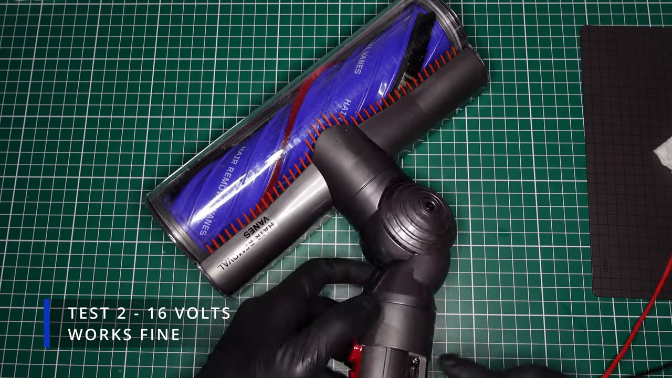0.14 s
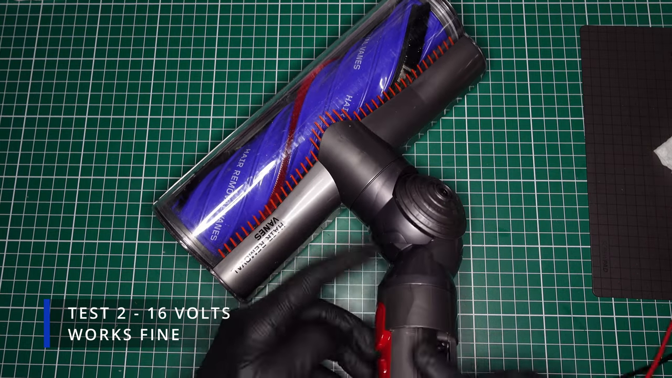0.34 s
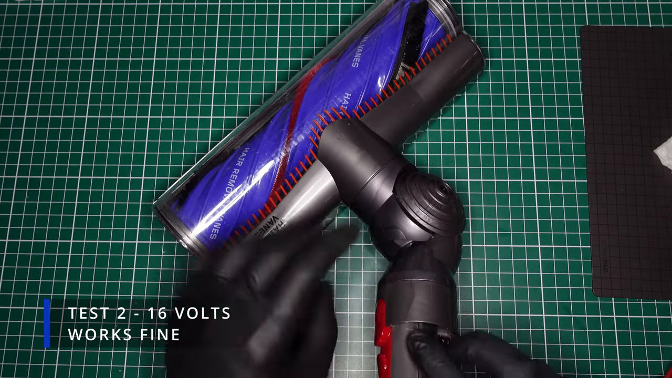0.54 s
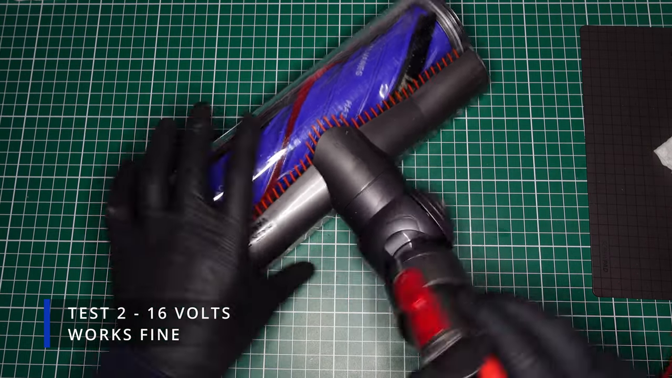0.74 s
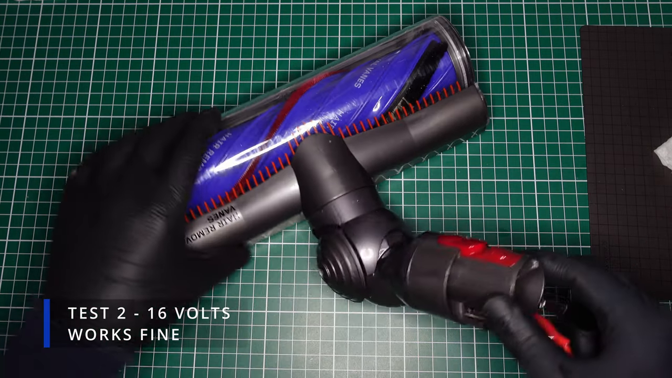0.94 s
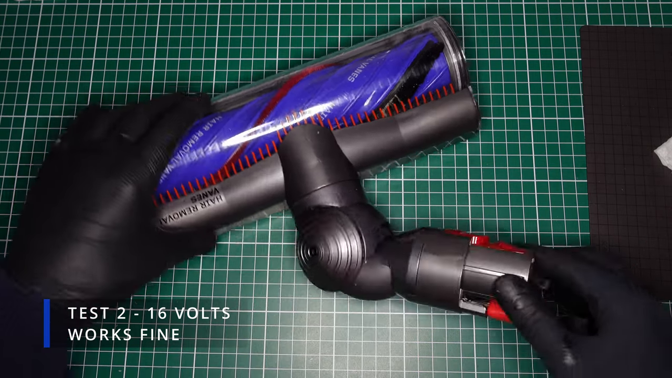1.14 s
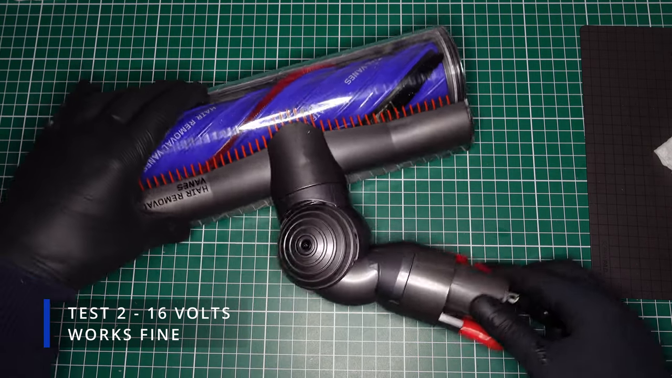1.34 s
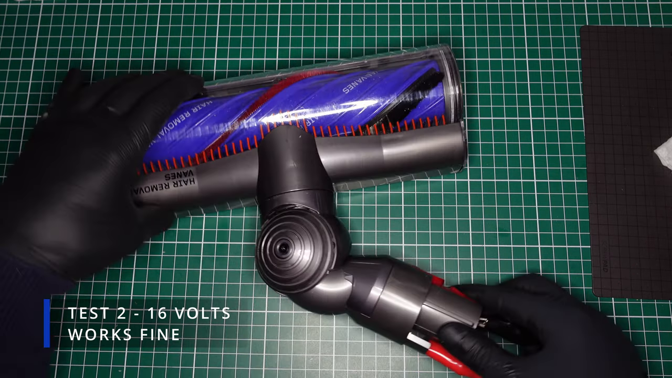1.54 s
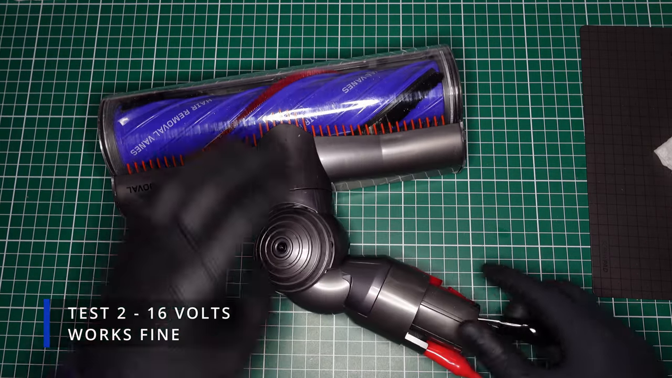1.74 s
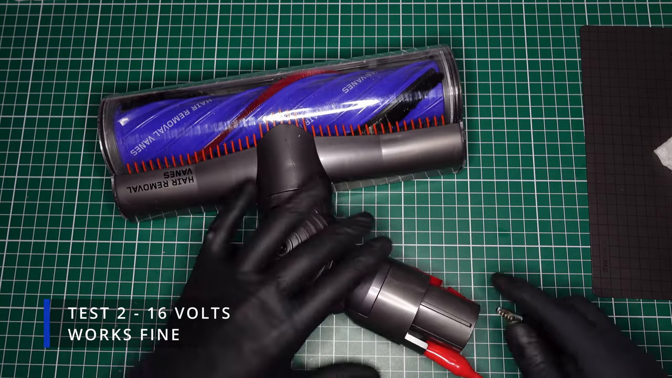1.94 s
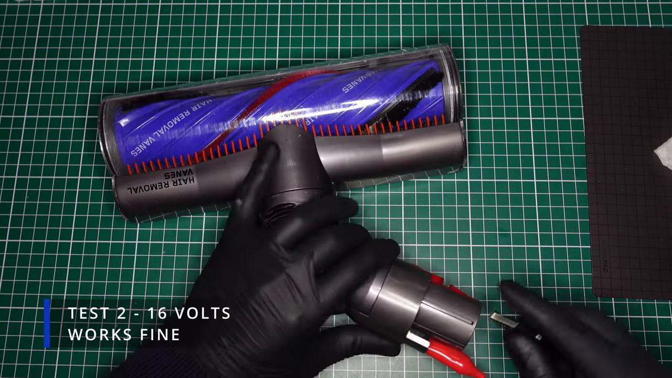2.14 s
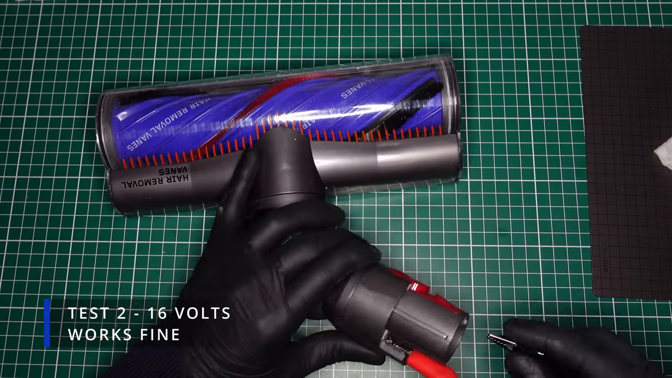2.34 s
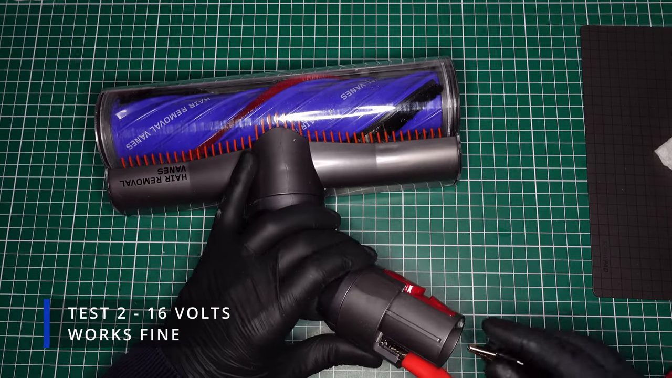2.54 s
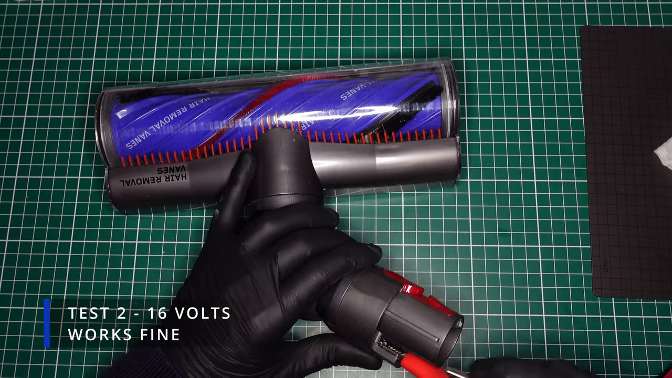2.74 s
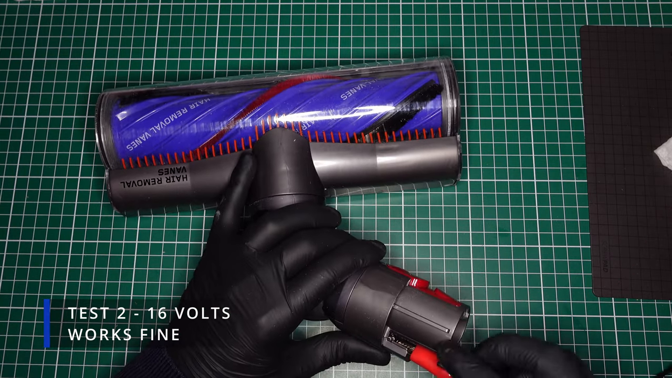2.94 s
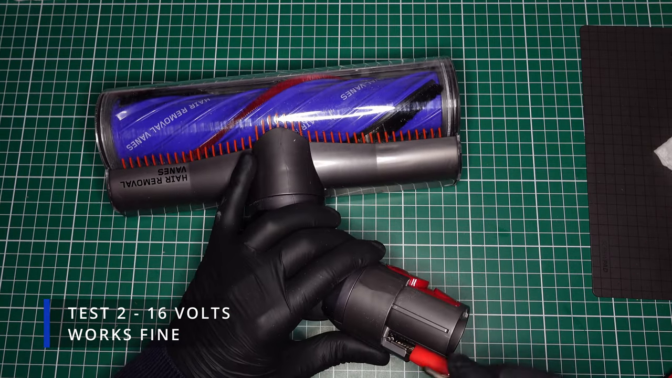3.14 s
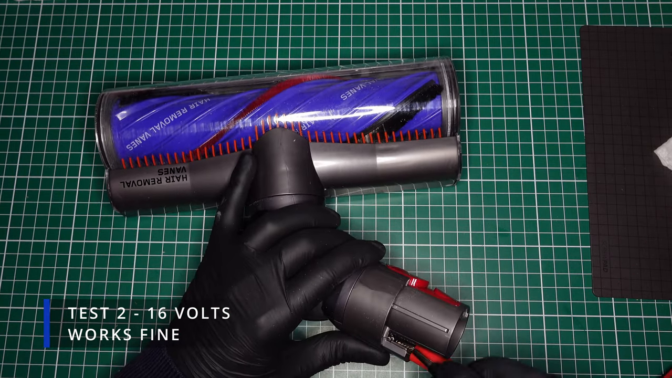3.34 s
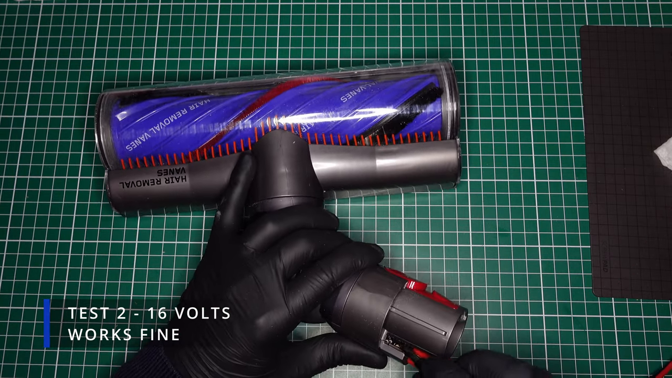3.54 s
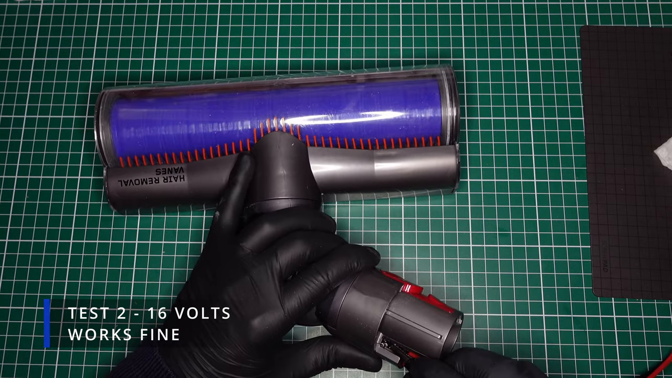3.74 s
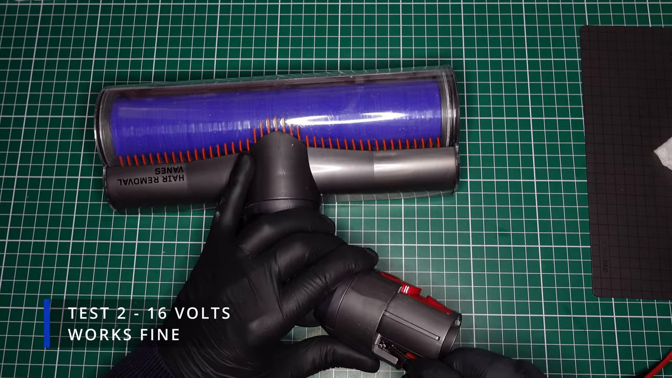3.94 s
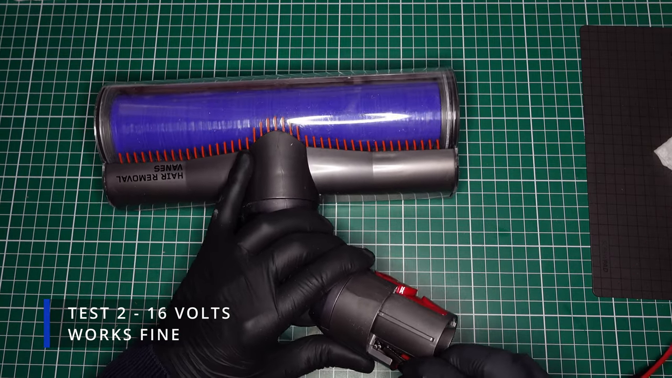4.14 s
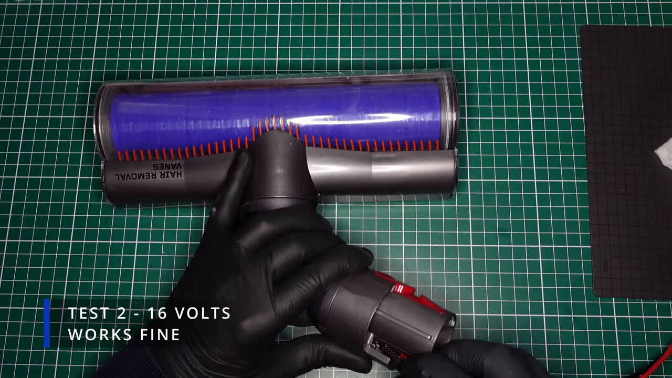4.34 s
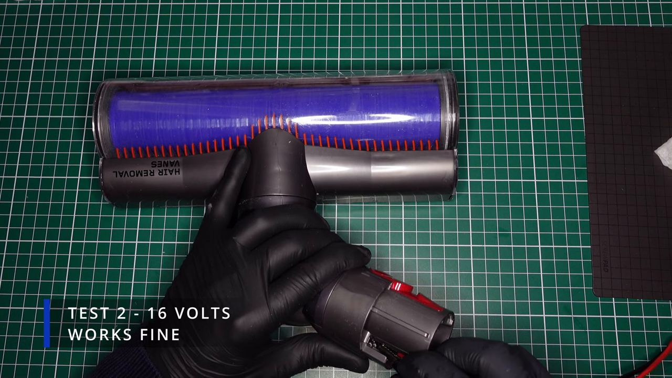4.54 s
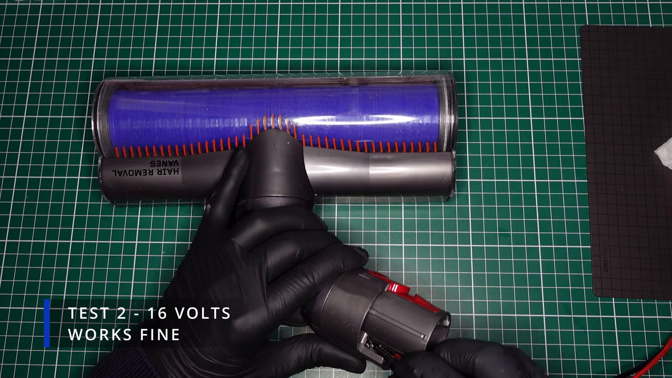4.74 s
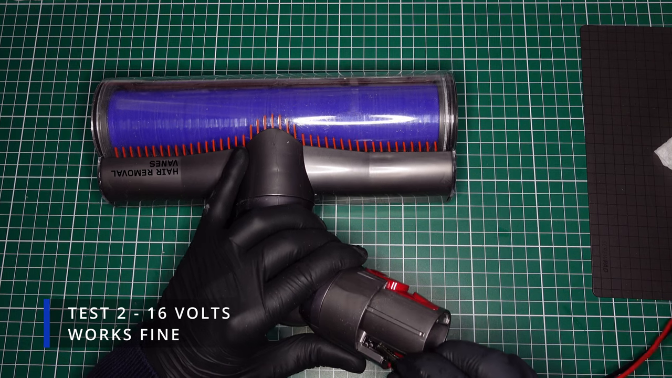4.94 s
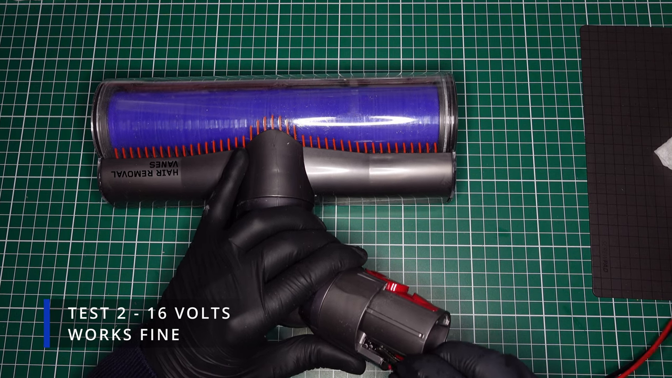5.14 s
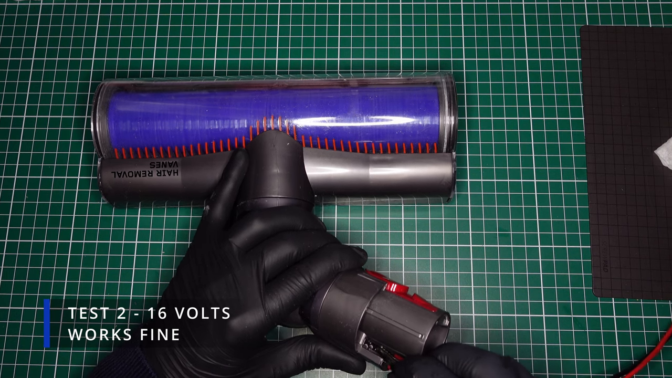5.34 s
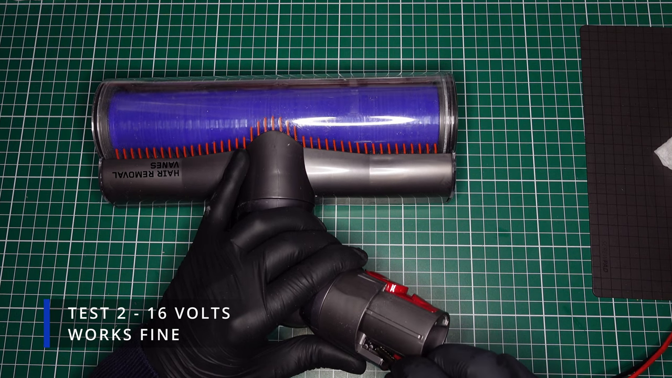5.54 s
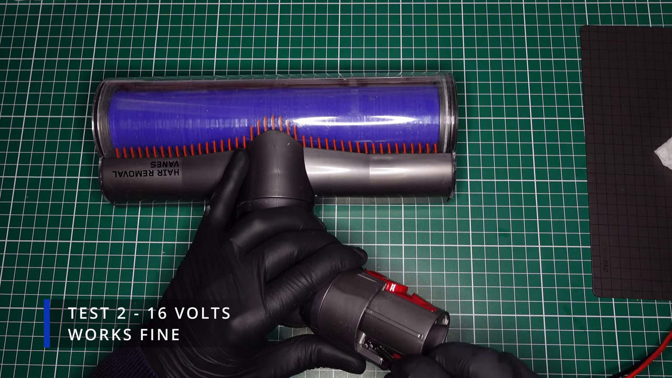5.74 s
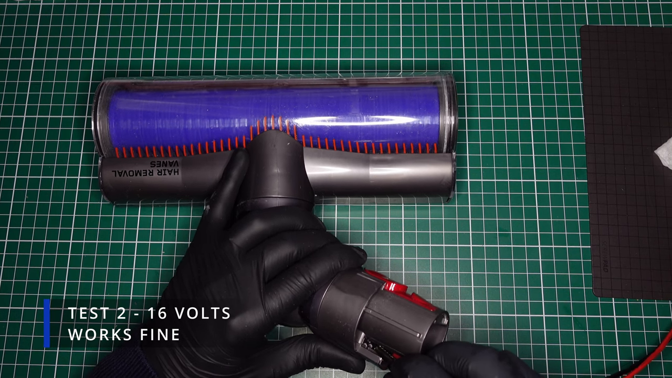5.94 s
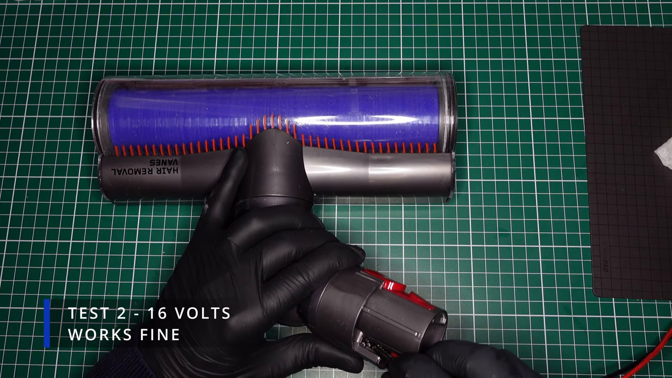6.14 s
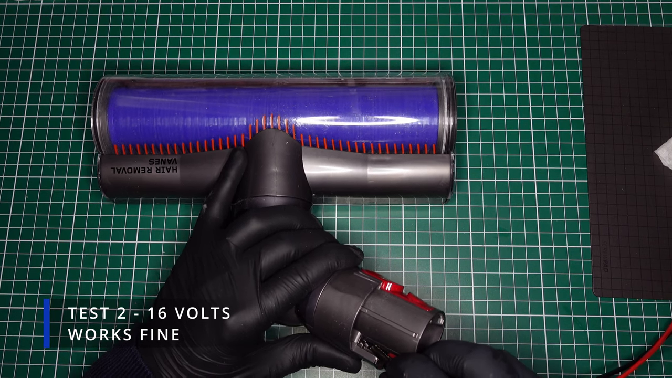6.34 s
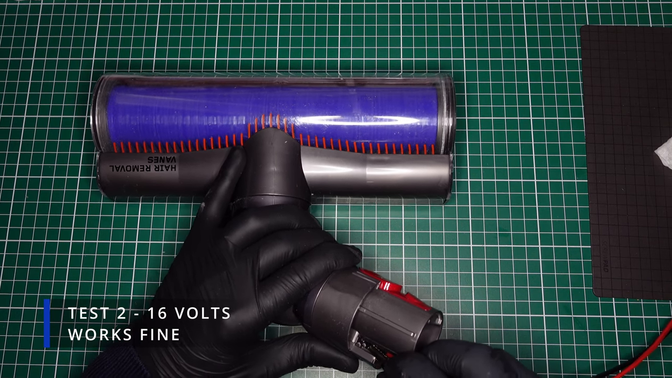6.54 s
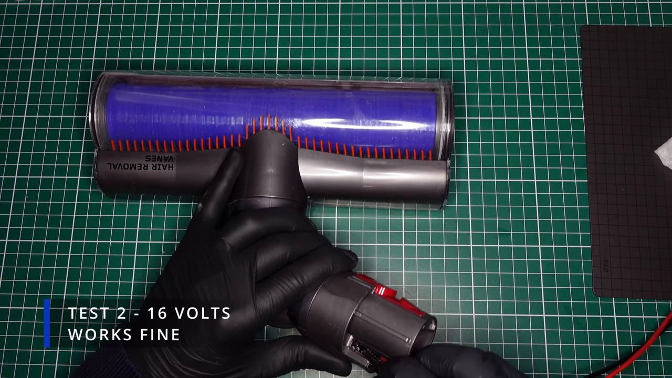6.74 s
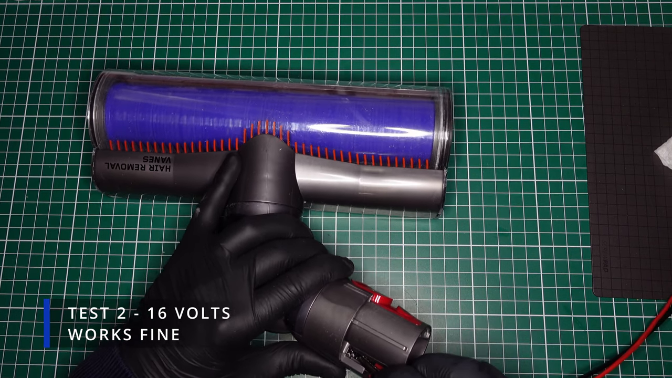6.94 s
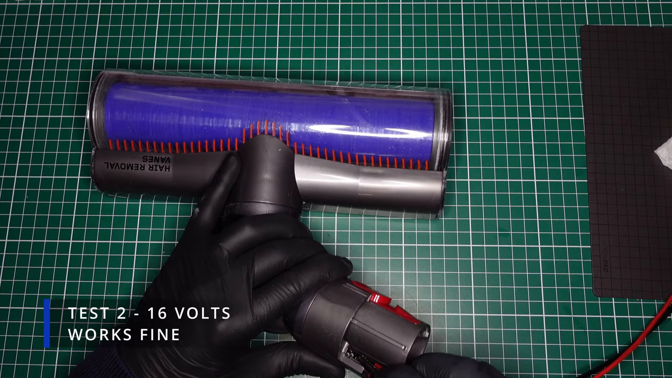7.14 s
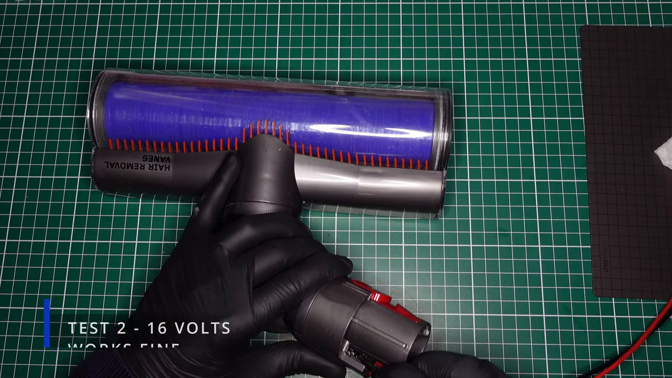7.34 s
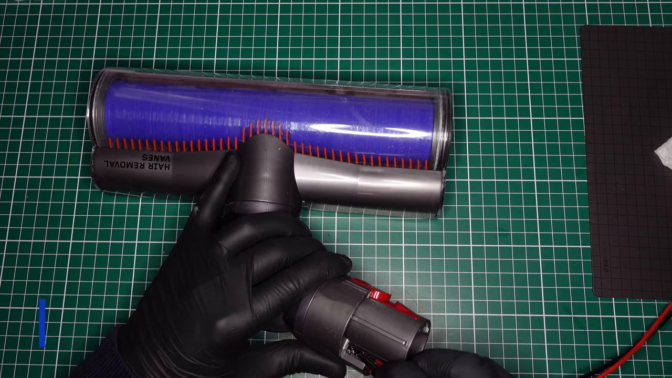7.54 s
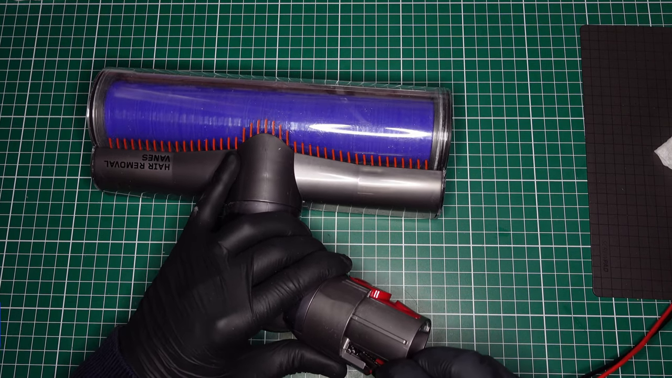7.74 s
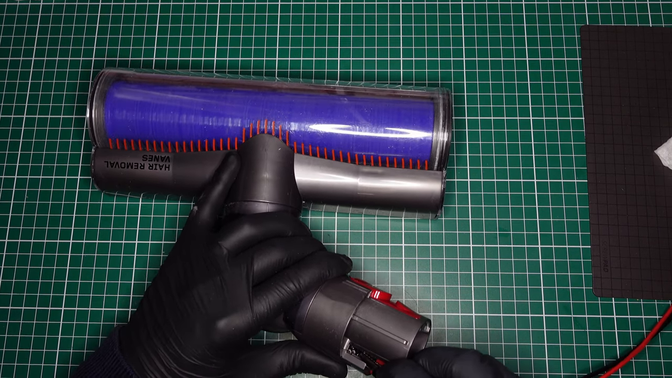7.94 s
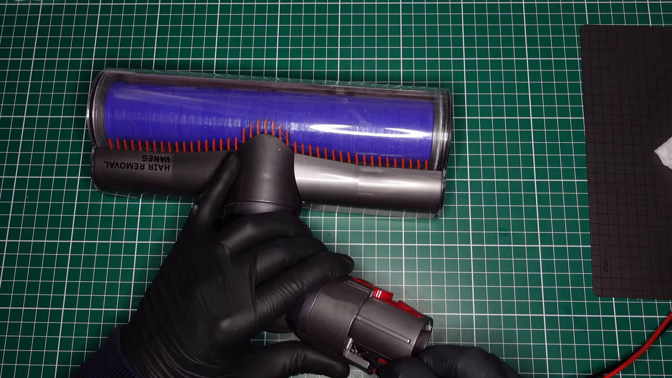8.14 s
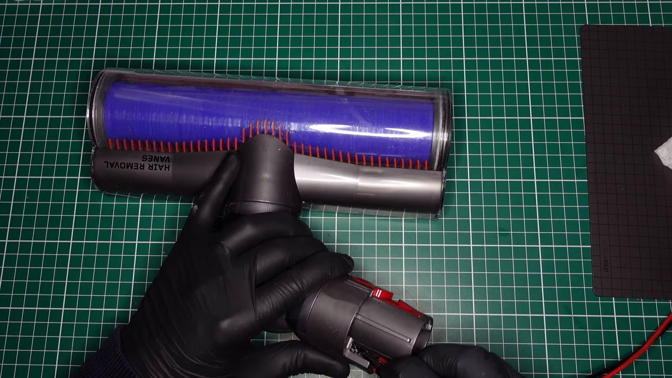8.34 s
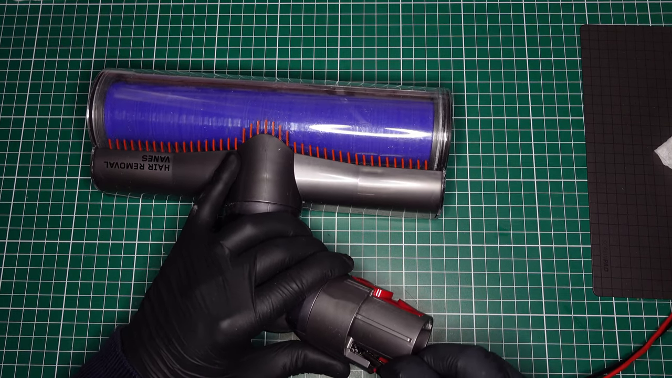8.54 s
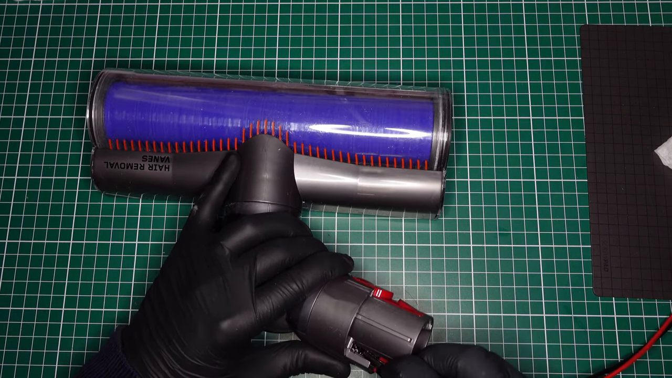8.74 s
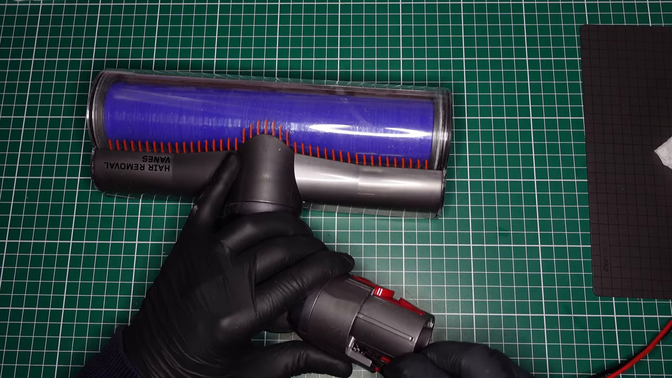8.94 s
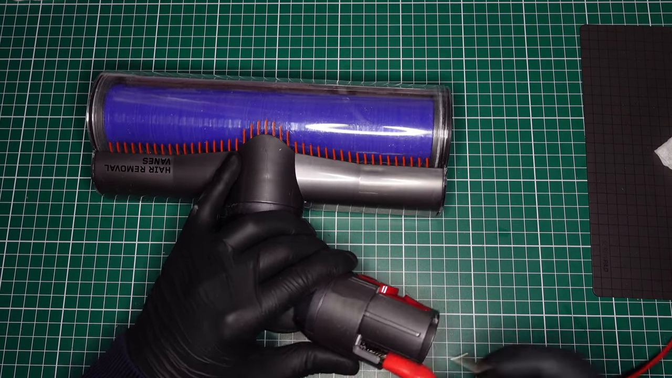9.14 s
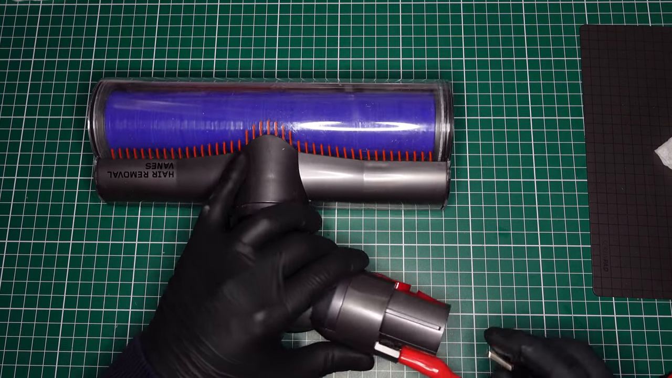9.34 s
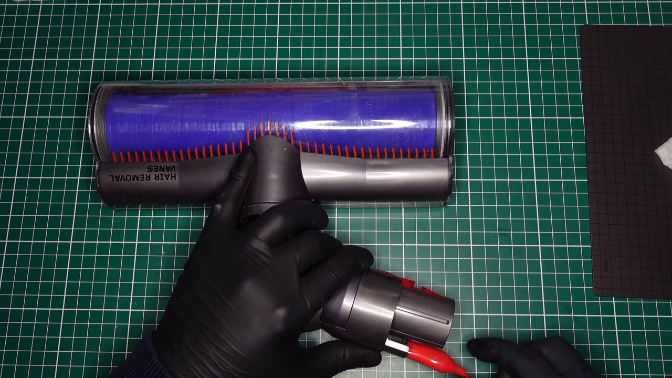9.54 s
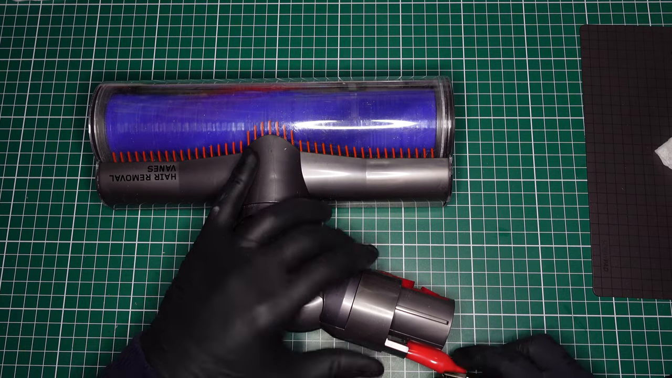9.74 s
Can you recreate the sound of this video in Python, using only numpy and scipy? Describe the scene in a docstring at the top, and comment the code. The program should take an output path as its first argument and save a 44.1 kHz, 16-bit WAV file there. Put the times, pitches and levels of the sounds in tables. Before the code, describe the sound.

A close microphone at a workbench in a small room, over very faint hiss. From 0 to 0.7 s gloves rustle softly with a few light plastic taps. At 0.75-1.4 s come sharp clicks, knocks and stuttering rubbing and scraping on a mat, strongest near 0.95 s. At 1.7-1.8 s a swivel joint cracks roughly with a hollow ring. Light handling follows, with a bright click at 2.2 s, then near quiet. At 3.64 s a clustered jolt and shudder start a motor, gliding up within half a second to a buzzing drone, nasal whine and bristle hiss. Power drops at 4.9 s; pitch falls with looser rattling and small flutters. A harder jolt at 5.56 s restarts it faster, steady until 7.06 s, then sagging. The third jolt at 7.49 s brings another steady whine until 9.03 s, followed by a rattling, falling coast-down.

```python
"""Plastic clicks, rubbing and creaks, then three times a jolt, a rise to a buzzing whine and a rattling slow-down.
Gloved hands turn the neck of a vacuum cleaner's brush head on a workbench and fit test leads to it; whenever
a lead touches the contact, the motor spins the brush bar up, and without power the bar coasts down.
The whine is built from multiples of the turning rate, lifted by the resonances of the plastic housing.
The clicks, rubbing and hiss are shaped noise, partly ringing through plastic parts and a small room."""
import sys
import numpy as np
from scipy import signal
from scipy.fft import rfft, irfft, next_fast_len
from scipy.io import wavfile
from scipy.ndimage import uniform_filter1d

SR = 44100
rng = np.random.default_rng(int(sys.argv[2]) if len(sys.argv) > 2 else 0)


def log_audio(samples):
    """Write samples as a 16-bit WAV file to the path given in sys.argv[1]."""
    # one column per channel
    frames = np.atleast_2d(samples).T
    # limit to full scale, then quantise
    limited = np.clip(frames, -1, 1)
    pcm = np.round(limited * 32767).astype(np.int16)
    wavfile.write(sys.argv[1], SR, pcm)


N = 432180
FULL_SPEED_HZ = 57.4  # turns per second taken as full speed

# A lead touches the contact, with relative levels of the run:
# (on [s], off [s], housing drone [dB], tooth whine [dB], bristle hiss [dB])
RUNS = [(3.641, 4.904, -36.5, -34.5, -33), (5.56, 7.06, -36, -34.5, -33), (7.489, 9.03, -36, -34, -33)]


def from_db(db):
    """Decibels to gain."""
    return 10 ** (np.asarray(db) / 20)


def rms_one(x):
    """Scale to rms 1."""
    return x / np.sqrt(np.mean(x ** 2) + 1e-20)


def at_hz(points, hz):
    """Read a spectrum on a log-frequency axis."""
    f, value = np.transpose(points)
    return np.interp(np.log(hz + 1e-6), np.log(f), value)


def drift(rate, step=1):
    """Random wander of spread 1 with so many turning points per second, at every step-th sample."""
    knots = rng.standard_normal(int(rate * N / SR) + 2)
    position = np.arange(0, N, step) * rate / SR
    return rms_one(np.interp(position, np.arange(len(knots)), knots))


def white():
    """Two unrelated noises."""
    return rng.standard_normal((2, N))


def coloured(pair, spectrum, likeness=None):
    """Two unrelated signals become a stereo sound filtered by the given spectrum; rms 1."""
    # how alike left and right usually are: (frequency [Hz], left-right likeness [0-1])
    usual_likeness = [(100, 1), (1000, 0.96), (2200, 1), (4500, 0.87), (14000, .87)]
    size = next_fast_len(N)
    hz = np.arange(size // 2 + 1) * SR / size
    alike = np.clip(at_hz(likeness or usual_likeness, hz), 0, 1)
    mid, side = rfft(pair, size) * from_db(at_hz(spectrum, hz))
    mid, side = mid * np.sqrt(1 + alike), side * np.sqrt(1 - alike)
    return rms_one(irfft(np.array([mid + side, mid - side]), size)[:, :N])


def burst(t60):
    """A quarter second of noise that falls by 60 dB in t60 seconds."""
    t = np.arange(SR // 4) / SR
    return rng.standard_normal(len(t)) * from_db(-60 * t / t60)


def grains(per_s, spread_db):
    """Separate tiny slips of uneven size, in two unrelated signals; rms 1."""
    happens = rng.random(N) < per_s / SR
    sizes = from_db(spread_db * np.minimum(rng.exponential(1, N), 3)) * happens
    return rms_one(sizes * rng.choice([-1, 1], (2, N)))


def add(track, s, sound):
    """Mix a sound into a track at a time."""
    i = round(s * SR)
    track[i:i + len(sound)] += sound[:N - i]


def swell(start_s, end_s, attack_s, t60):
    """Gain that rises to 1 by the start, holds to the end and dies away."""
    t = np.arange(N) / SR
    rise = np.clip(1 + (t - start_s) / attack_s, 0, 1) ** 2
    return rise * from_db(-60 * np.clip((t - end_s) / t60, 0, 2))


def resonate(x, hz, width_hz):
    """One resonance, with gain 1 on top."""
    r = np.exp(-np.pi * width_hz / SR)
    top = np.array([1, 0, -1]) * (1 - r * r) / 2
    return signal.lfilter(top, [1, -2 * r * np.cos(2 * np.pi * hz / SR), r * r], x + 1e-18)


def resonate_twice(x, hz, width_hz):
    """The same resonance twice in a row, for steeper sides."""
    return resonate(resonate(x, hz, width_hz), hz, width_hz)


def ring(force, modes):
    """A force sets decaying modes (hz, dB, t60) ringing."""
    out = 0
    for hz, level_db, t60 in modes:
        r, w = from_db(-60 / (max(t60, .004) * SR)), 2 * np.pi * hz / SR
        mode = signal.lfilter([0, np.sin(w)], [1, -2 * r * np.cos(w), r * r], force + 1e-18)
        out = out + from_db(level_db) * mode
    return out


def without_bass(x, edge_hz):
    """Cut away the bass below the edge."""
    return signal.sosfilt(signal.butter(4, edge_hz, "high", fs=SR, output="sos"), x)


def tone(turns, order, flutter_db, flutter_rate, wobble=0):
    """One unsteady multiple of the turning rate, its phase wobbling by so many radians; rms 1."""
    angle = 2 * np.pi * order * turns + wobble * drift(flutter_rate)
    return rms_one(np.sin(angle) * from_db(flutter_db * drift(flutter_rate)))


def workshop(x, wet_db=-11.5, t60=0.42, wall_hz=7000):
    """A small room answers with a soft, duller tail."""
    t = np.arange(SR // 2) / SR
    mid, side = rng.standard_normal((2, len(t))) * from_db(-60 * t / t60) * (t > .004)
    dull = signal.butter(1, wall_hz, fs=SR, output="sos")
    tail = signal.sosfilt(dull, [mid + .5 * side, mid - .5 * side])
    tail /= np.sqrt(np.sum(tail ** 2) / 2)
    return x + from_db(wet_db) * signal.fftconvolve(x[None], tail, axes=1)[:, :N]


def room_hiss(level_db=-71.5):
    """Faint steady noise that reaches the two sides only partly alike."""
    # colour of the hiss: (frequency [Hz], relative level [dB per Hz])
    hiss_colour = [(40, -50), (100, -30), (260, -4.5), (550, -3), (1100, -1), (2100, 3), (3200, -7.5),
                   (6000, -11), (8000, -13), (10600, -11), (15800, -14.5)]
    # its spread: (frequency [Hz], left-right likeness [0-1])
    room_likeness = [(60, 0.48), (180, 0.79), (550, 0.39), (1650, 0.64), (4970, 0.56), (15000, 0.82)]
    return from_db(level_db) * coloured(white(), hiss_colour, room_likeness)


def stroke_gains(attack_s=0.068, t60=0.55):
    """Gains of rubbing plastic and of rustling gloves; overlapping strokes add in power."""
    # strokes of the hands over the head, with relative levels:
    # (start [s], end [s], plastic rubbing [dB], glove rustle [dB])
    strokes = [(0.0, 0.7, -72, -68.5), (0.758, 0.9, -54, -61), (0.99, 1.072, -56.5, -62),
               (1.134, 1.247, -53, -63), (1.457, 1.557, -66, -78), (1.68, 2.853, -73, -75.5),
               (2.22, 2.326, -65.5, -72), (3.19, 3.253, -71, -71)]
    power = 0
    for start, end, *levels_db in strokes:
        power = power + np.outer(from_db(levels_db), swell(start, end, attack_s, t60)) ** 2
    return np.sqrt(power)


def mat_judder(hz=560, width_hz=90):
    """The head judders as it is slid over the mat: noise through one narrow resonance."""
    # the one judder: (start [s], end [s], level [dB])
    judder = (0.747, 0.794, -54.5)
    start, end, level_db = judder
    noise = resonate_twice(white()[0], hz, width_hz)
    return rms_one(noise) * from_db(level_db) * swell(start, end, attack_s=0.068, t60=0.55)


def handling(rub_db=-2.0, glove_db=-1.0, stutter_db=1.5, smooth_db=-2.0):
    """Plastic drags over the mat in separate uneven slips and judders; gloves crackle softly."""
    # colour of rubbing plastic: (frequency [Hz], relative level [dB per Hz])
    rub_colour = [(35, -66), (60, -46), (107, -7), (168, -26), (311, -23), (584, -1), (651, -4), (809, 1),
                  (1040, -8), (1140, -4), (1580, -4.5), (1790, 0), (4500, -16), (5850, -40), (9900, -120)]
    # colour of the gloves: (frequency [Hz], relative level [dB per Hz])
    glove_colour = [(1760, -23), (3000, -2), (3850, -7), (4400, 0), (5810, 7), (6860, 1), (7670, 2),
                    (15800, -6.5)]
    plastic, rustle = stroke_gains()
    stutter = from_db(stutter_db * drift(60))
    slips = grains(per_s=650, spread_db=3.5) + from_db(smooth_db) * white()
    rub = coloured(slips * stutter, rub_colour) * plastic * from_db(rub_db)
    creases = grains(per_s=900, spread_db=3.0) + white()
    gloves = coloured(creases * stutter, glove_colour) * rustle * from_db(glove_db)
    return rub + mat_judder() + gloves


def scrapes(centre_hz=1300, width_hz=1500, attack_s=0.017, t60=0.11):
    """The sole of the head scrapes over the mat: short runs of gritty slips ring the sole plate."""
    # the scrapes: (start [s], end [s], level [dB])
    scrape_times = [(1.133, 1.16, -58), (1.227, 1.246, -51), (1.265, 1.268, -56)]
    grit = resonate_twice(grains(per_s=1500, spread_db=4.0)[0], centre_hz, width_hz)
    gain = sum(from_db(db) * swell(start, end, attack_s, t60) for start, end, db in scrape_times)
    return rms_one(grit) * gain


def ticks(t60=0.011, width_hz=1100):
    """Head and neck catch and let go: each brief slip rings one broad resonance of the plastic."""
    # the dry ticks: (time [s], peak level [dB], pitch [Hz])
    tick_times = [(0.75, -41, 1900), (0.765, -51, 2800), (0.816, -46, 3900), (0.829, -49, 2300),
                  (0.851, -46, 2080), (0.853, -31.5, 1820), (0.936, -39, 2700), (0.957, -30, 5200),
                  (1.031, -36, 1950), (1.045, -48, 2300), (1.137, -47, 5900), (1.147, -44, 1150),
                  (1.202, -42, 1300), (1.236, -47, 1500), (1.243, -42, 1700), (1.265, -46, 2200),
                  (2.549, -57, 6300), (2.951, -52, 2200), (3.189, -58, 5200), (3.22, -58, 5100),
                  (3.371, -60, 5300)]
    out = np.zeros(N)
    for s, peak_db, hz in tick_times:
        tick = resonate_twice(burst(t60), hz, width_hz)
        add(out, s, tick / np.abs(tick).max() * from_db(peak_db))
    return out


def joint_snaps(level_db=10.0, crack_db=-18.5, tail_db=-29.0, tail_t60=0.25):
    """The swivel slips with a rough crack that rings its hollow neck."""
    # the joint snaps over: (time [s], relative level [dB], 60 dB decay [s])
    snaps = [(1.679, -29, 0.031), (1.687, -36, 0.022), (1.716, -45, .025), (1.732, -52, .04),
             (1.75, -49, .015), (1.779, -51, 0.036), (1.813, -43, .05), (1.817, -33.5, 0.033),
             (1.824, -45, .02)]
    # resonances of the neck, each applied twice at double width:
    # (frequency [Hz], half the width used [Hz], relative level [dB])
    joint = [(1630, 97, -8), (2360, 280, -1.5), (2520, 260, 1.5), (6040, 1900, -22.5), (8700, 800, -28)]
    slip, tail = np.zeros(N), np.zeros(N)
    for s, peak_db, t60 in snaps:
        add(slip, s, burst(t60) * from_db(peak_db))
        add(tail, s, burst(tail_t60) * from_db(peak_db + tail_db))
    tail *= from_db(4 * drift(220))  # the joint chatters as it settles
    neck = sum(from_db(db) * resonate_twice(slip + tail, hz, 2 * width) for hz, width, db in joint)
    return from_db(level_db) * neck + from_db(crack_db) * without_bass(slip, edge_hz=490)


def knocks(rows, level_db, bass_t60, treble_t60, shell_db, snap_db=4.0, snap_t60=0.027):
    """A sharp snap and a crack, set to die slower in the bass, ring the shell; brightness tilts both."""
    # bench thud, then four bands of the crack: (low edge [Hz], high edge [Hz])
    knock_bands = [(95, 150), (420, 1200), (1200, 3500), (3500, 8000), (8000, 15000)]
    # colour shared by every crack, one relative level [dB] for each of the four crack bands
    crack_colour = (-11, -1.5, -1, -7.5)
    # ringing of the shell: (frequency [Hz], relative level [dB], 60 dB decay [s])
    shell = [(564, -9.5, .14), (954, -14, .12), (1414, -8, .06), (1747, 9, 0.047), (2037, 7.5, 0.056),
             (2420, -9, 0.41), (2740, -3.5, 0.078), (3350, -1.5, .07), (5200, 0.5, .06)]
    out = np.zeros(N)
    octaves = np.log2(knock_bands).mean(axis=1)
    middle = octaves[2]
    for k, t60 in enumerate(np.geomspace(bass_t60, treble_t60, len(knock_bands))):
        band = signal.butter(3, knock_bands[k], "band", fs=SR, output="sos")
        for s, hit_db, bright_db, thud_db in rows:
            band_db = thud_db
            if k > 0:
                band_db = hit_db + crack_colour[k - 1] + bright_db * (octaves[k] - middle)
            crack = signal.sosfilt(band, burst(t60) + from_db(snap_db) * burst(snap_t60))
            loudness = np.std(crack[:SR // 50])
            add(out, s, crack / loudness * from_db(band_db + level_db))
    for s, hit_db, bright_db, thud_db in rows:
        modes = [(hz, db + bright_db * (np.log2(hz) - middle), t60) for hz, db, t60 in shell]
        add(out, s, from_db(hit_db + shell_db) * ring(signal.unit_impulse(SR // 2), modes))
    return out


def part_knocks():
    """Plastic parts knock and click in the hands: short cracks, some with a thud of the bench."""
    # knocks, with relative levels:
    # (time [s], level [dB], brightness [dB per octave], bench thud [dB])
    knock_times = [(0.073, -60, 1, -96), (0.175, -51.5, -1, -95), (0.217, -65, 3, -97),
                   (0.271, -61.5, 5, -79), (0.593, -70, 5.5, -99), (0.748, -49, -5, -59),
                   (0.819, -52, -5, -62), (0.85, -49, -5.5, -75), (0.95, -44, -3, -72),
                   (0.954, -31.5, -2, -58), (0.967, -35.5, -5.5, -55), (1.029, -47.5, -3, -62),
                   (1.136, -54.5, 4.5, -81), (1.229, -53, 2, -82), (1.261, -57, 1, -90),
                   (1.398, -38.5, -4, -75), (2.011, -52, -11, -94), (2.175, -57.5, -5.5, -98),
                   (2.235, -41.5, 4, -101), (2.298, -56, 1, -98), (2.546, -74, 4, -102),
                   (2.948, -65, -4, -100), (3.325, -72, 1, -103), (3.363, -70, 2.5, -108)]
    return knocks(knock_times, level_db=-8.5, bass_t60=0.12, treble_t60=0.067, shell_db=-13.0)


def drive_jolts():
    """The drive takes up its slack: heavier knocks with a longer bass and a weaker snap."""
    # jolts, with relative levels:
    # (time [s], level [dB], brightness [dB per octave], bench thud [dB])
    jolt_times = [(3.639, -35, 0, -57), (3.665, -31, -3.5, -50), (3.693, -31.5, 0, -54),
                  (5.561, -27.5, -0.5, -68), (5.57, -30.5, -5, -72), (7.488, -27, -1.5, -44)]
    return knocks(jolt_times, level_db=-5.0, bass_t60=0.35, treble_t60=0.092, shell_db=-9.0, snap_db=-6.0)


def shudders(ring_hz=560, rumble_db=-3.0, rumble_hz=370, rumble_width_hz=380):
    """As the belt bites, the lowest housing resonance rings short and rough over a rumble."""
    # the housing shudders: (start [s], end [s], level of the ringing [dB])
    shudder_times = [(3.657, 3.695, -40), (3.681, 3.685, -36), (5.572, 5.581, -28.5), (7.495, 7.504, -33.5)]
    ringing = tone(np.arange(N) / SR, ring_hz, flutter_db=2.0, flutter_rate=160, wobble=0.7)
    rumble = rms_one(resonate_twice(white()[0], rumble_hz, rumble_width_hz))
    gain = sum(from_db(db) * swell(start, end, attack_s=0.008, t60=0.093) for start, end, db in shudder_times)
    return (ringing + from_db(rumble_db) * rumble) * gain


def flutters(width_hz=300, attack_s=.015, t60=0.089):
    """The slowing bar flutters against the housing in short runs of small taps."""
    # the flutters: (start [s], end [s], pitch [Hz], level [dB])
    flutter_times = [(5.361, 5.41, 2120, -46), (5.45, 5.451, 1860, -35.5), (5.465, 5.473, 1940, -49),
                     (7.355, 7.365, 1850, -39), (9.486, 9.56, 2080, -49), (9.6, 9.616, 1965, -47)]
    taps, out = grains(per_s=400, spread_db=2.0)[0], 0
    for start, end, hz, level_db in flutter_times:
        run = rms_one(resonate_twice(taps, hz, width_hz))
        out = out + run * from_db(level_db) * swell(start, end, attack_s, t60)
    return out


def bar_speed(wander=0.0008, coast_s=0.575):
    """Turns per second: power runs the bar up; without it, drag slows it, most strongly at first."""
    # run-up after each contact, one list per run: (time [s], speed [turns per s])
    spin_ups = [
        [(3.69, 31), (3.75, 38.5), (3.95, 53.2), (4.0, 55.2), (4.06, 56.3), (4.2, 56.86), (4.9, 56.75)],
        [(5.58, 37), (5.61, 45.5), (5.65, 50.5), (5.7, 54), (5.75, 56), (5.8, 56.9), (5.9, 57.4), (6.2, 57.48)],
        [(7.5, 40), (7.52, 45), (7.55, 49.5), (7.6, 54), (7.65, 56.1), (7.7, 57), (7.8, 57.43), (9.0, 57.25)],
    ]
    t, speed = np.arange(N) / SR, np.ones(N)
    for (on, off, *levels), spin_up in zip(RUNS, spin_ups):
        i = round(on * SR)
        run_up = [(on, speed[i])] + spin_up  # starts from the speed left over
        driven = np.interp(np.minimum(t[i:], off), *np.transpose(run_up))
        speed[i:] = driven * np.exp(-np.maximum(t[i:] - off, 0) / coast_s)
    return speed * (1 + wander * drift(5))


def off_speed(speed):
    """0 at full speed, 1 once the bar turns clearly slower."""
    return np.clip(9 * (1 - speed / FULL_SPEED_HZ), 0, 1)


def hand_pressure():
    """How hard the hand presses the head down, at every sample."""
    # (time [s], pressure [0-1])
    press = [(3.95, 0.6), (4.12, 0.34), (4.33, 0.5), (4.5, 1), (4.95, 0.9), (5.2, 0.54), (5.7, 0.92),
             (6.75, 0.96), (6.95, 0.58), (7.5, 0.35)]
    return np.clip(np.interp(np.arange(N) / SR, *np.transpose(press)), 0, 1)


def running_levels(speed, press, powered, loud_above_hz=46.7, deepest=0.7):
    """Drone, whine and hiss in dB: drone and whine grow under the hand, all fade at low speed."""
    # loss while pulling, per whole share of speed lost: (drone [dB], whine [dB], hiss [dB])
    pulling_loss = (28, 18, 27)
    # the same while coasting: (drone [dB], whine [dB], hiss [dB])
    coasting_loss = (25.5, 29.5, 16)
    on, off, drone_db, whine_db, hiss_db = np.transpose(RUNS)
    run = np.maximum(np.searchsorted(on, np.arange(N) / SR) - 1, 0)
    slowness = np.clip(1 - speed / loud_above_hz, 0, deepest)
    slope = np.outer(pulling_loss, powered) + np.outer(coasting_loss, 1 - powered)
    drone_loss, whine_loss, hiss_loss = slowness * slope
    drone = drone_db[run] + 5.5 * press - drone_loss
    whine = whine_db[run] + 3 * press - whine_loss
    return drone, whine, hiss_db[run] - hiss_loss


def housing_db(hz, bass_hz=330):
    """The housing lifts what falls on its resonances and radiates bass poorly."""
    # main resonances: (frequency [Hz], width [Hz], lift [dB])
    housing = [(548, 310, 14), (814, 67, 8.5), (2040, 560, 17)]
    peaks = sum(db / (1 + (2 * (hz - f) / width) ** 2) for f, width, db in housing)
    return peaks - 10 * np.log10(1 + (bass_hz / hz) ** 4)


def contact_phases(count, scatter):
    """Two contacts a turn: every second multiple keeps loosely in step, much smeared by the housing."""
    steps = scatter * rng.standard_normal((count // 2, 2))
    return (rng.uniform(0, 2 * np.pi, 2) + np.cumsum(steps, axis=0)).ravel()


def drive_lines(turns, speed, press, drone_db, whine_db, drone_trim_db=-2.5, waver_db=1.5, flutter_db=1.44,
                throb_db=2.0, throb_hz=3.45, hum_fade_db=47.0, hum_below_hz=450):
    """Multiples of the turning rate glide through the housing resonances; hand pressure shifts their balance."""
    # lines with the head pressed firmly on the bench: (multiple of the turning rate, relative level [dB])
    firm_orders = [(1, -64), (2, -14), (3, -31.5), (4, -21), (5, -10), (6, -14.5), (7, -57), (8, -21.5),
                   (9, -23.5), (10, 2), (11, -16), (12, -10.5), (13, -15.5), (14, 0.5), (15, -2),
                   (16, -14.5), (17, -11), (18, -3), (19, -4), (20, -9.5), (21, -8), (22, -6), (23, -11.5),
                   (24, -21), (25, -10), (26, -17.5), (27, -6.5), (28, -8.5), (29, -3), (30, -7.5),
                   (31, -4.5), (32, -8), (33, -9.5), (34, -22), (35, -0.5), (36, -0.5), (37, -5.5),
                   (38, -3), (39, -7.5), (40, -17), (41, 1), (42, -9.5), (43, -5.5), (44, -15), (45, -2.5),
                   (46, -12), (47, -8), (48, -14)]
    # lines with the head resting lightly: (multiple of the turning rate, relative level [dB])
    light_orders = [(1, -60), (2, -21), (3, -23.5), (4, -33), (5, -9.5), (6, -18), (7, -25), (8, -8),
                    (9, 4.5), (10, -5), (11, -8), (12, -8), (13, -3), (14, -14), (15, -8), (16, -9),
                    (17, -15), (18, -5), (19, -16), (20, -10.5), (21, -12), (22, -10.5), (23, -13),
                    (24, -3), (25, -4), (26, -0.5), (27, -8), (28, -4), (29, -14), (30, -10), (31, -13),
                    (32, -7), (33, 4), (34, -3), (35, -9), (36, 1.5), (37, 2), (38, 4.5), (39, 2),
                    (40, -29), (41, -7), (42, 4), (43, 1), (44, 7.5), (45, -0.5), (46, 5), (47, -14),
                    (48, -4)]
    step = 64  # the levels change slowly, so work them out at every 64th sample
    coarse = np.arange(0, N, step)
    share_lost = 1 - speed[coarse] / FULL_SPEED_HZ
    firm_db, light_db = (np.array(table)[:, 1:] for table in (firm_orders, light_orders))
    orders = np.arange(1, len(firm_db) + 1)[:, None]
    level_db = light_db + press[coarse] * (firm_db - light_db)
    # the low multiples together carry the drone, the high ones the whine
    low = orders[:, 0] <= 26
    for group, group_db in ((low, drone_db + drone_trim_db), (~low, whine_db)):
        total_db = 10 * np.log10(np.sum(from_db(level_db[group]) ** 2, axis=0))
        level_db[group] += group_db[coarse] - total_db
    level_db += housing_db(orders * speed[coarse]) - housing_db(orders * FULL_SPEED_HZ)
    level_db += [waver_db * drift(3, step) + flutter_db * drift(25, step) for k in orders]
    # the low hum builds only near full speed, and its second multiple throbs
    level_db -= hum_fade_db * share_lost / (1 + (orders * FULL_SPEED_HZ / hum_below_hz) ** 4)
    started = np.max([on * (coarse / SR > on) for on, *rest in RUNS], axis=0)
    level_db[1] += throb_db * np.sin(2 * np.pi * throb_hz * (coarse / SR - started))
    phases = contact_phases(count=len(orders), scatter=1.9)
    out, angle = np.zeros(N), (2 * np.pi * (turns % 1)).astype(np.float32)
    for k, gain in enumerate(from_db(level_db), 1):
        out += np.repeat(gain, step)[:N] * np.sin(k * angle + float(phases[k - 1]))
    return np.sqrt(2) * out


def passing(hz, centre_hz, width_hz):
    """Gain of a line that sweeps through a resonance."""
    return np.exp(-(2 * (hz - centre_hz) / width_hz) ** 2)


def gliding_whines(turns, speed, coasting, drone_db, whine_db, low_peak_db=-6.0, pulley_db=4.0):
    """Tooth rate and sidebands, and later the slack pulley, sing out as they cross housing resonances."""
    # tooth rate and sidebands, with relative levels:
    # (multiple of the turning rate, while pulling [dB], while coasting [dB])
    mesh_lines = [(42, -4.5, -11), (44, 0.5, 1.5), (45, -13, -4), (46, -5.5, -8), (48, -0.5, -8)]
    mesh = 0
    for order, pulling_db, coasting_db in mesh_lines:
        hz = order * speed
        gain = passing(hz, centre_hz=2124, width_hz=380)
        gain += coasting * from_db(low_peak_db) * passing(hz, centre_hz=1710, width_hz=460)
        line = tone(turns, order, flutter_db=2.5, flutter_rate=90, wobble=0.4 + 0.25 * coasting)
        mesh = mesh + line * gain * from_db(pulling_db + coasting * (coasting_db - pulling_db))
    pulley_order = 19  # multiple of the turning rate
    pulley = tone(turns, pulley_order, flutter_db=3.0, flutter_rate=99, wobble=0.5) * coasting
    pulley *= passing(pulley_order * speed, centre_hz=573, width_hz=117)
    return mesh * off_speed(speed) * from_db(whine_db) + pulley * from_db(drone_db + pulley_db)


def whistles(turns, speed):
    """High whistles, each locked to the nearest multiple of the turning rate."""
    # the belt seats differently on every start, so other multiples whistle for a while:
    # (start [s], end [s], approximate pitch [Hz], relative level [dB])
    whistle_times = [(4.05, 4.92, 2613, -43), (4.45, 4.92, 2783, -43), (4.293, 4.92, 3510, -54),
                     (4.35, 4.92, 4450, -49), (4.45, 4.92, 4942, -57), (4.0, 4.92, 3980, -51),
                     (4.45, 4.92, 4280, -56), (4.45, 4.92, 4771, -55), (4.45, 4.92, 6530, -51),
                     (4.5, 4.92, 7385, -51), (5.85, 6.8, 2816, -54), (5.85, 6.9, 3110, -54),
                     (5.85, 6.8, 3540, -50), (5.85, 6.9, 3600, -51), (5.85, 6.8, 3760, -50.5),
                     (5.85, 6.9, 4090, -43.5), (5.85, 6.9, 5030, -55), (5.85, 6.9, 5856, -46),
                     (5.85, 6.9, 5936, -61), (7.75, 9.05, 2813, -51.5), (7.75, 9.05, 3038, -53),
                     (7.75, 9.05, 3096, -48), (7.75, 9.05, 3775, -51.5), (7.9, 9.05, 4000, -55),
                     (7.9, 9.05, 4420, -60), (7.9, 9.05, 4930, -57), (7.9, 9.05, 5504, -49.5),
                     (7.9, 9.05, 6340, -58)]
    out = 0
    for start, end, hz, level_db in whistle_times:
        order = round(hz / speed[round((start + end) / 2 * SR)])
        line = tone(turns, order, flutter_db=1.5, flutter_rate=9, wobble=0.15)
        out = out + line * from_db(level_db) * swell(start, end, attack_s=0.23, t60=0.74)
    return out


def each_turn(turns, pattern):
    """Read a pattern that comes round once per turn."""
    return np.interp(turns % 1, np.linspace(0, 1, len(pattern) + 1), np.append(pattern, pattern[0]))


def tooth_buzz(turns, count=290, change_rate=1.186):
    """Roughness of the running surfaces, alike from turn to turn but slowly shifting: a dense comb of lines."""
    lines = np.exp(2j * np.pi * rng.random((3, 2, count)))
    clusters = rms_one(uniform_filter1d(rng.standard_normal((3, 1, count)), 4))
    lines *= from_db(3 * clusters)  # neighbouring lines are strong or weak together
    # three stereo patterns blend into one another
    weights = np.array([drift(change_rate) for track in lines])
    weights /= np.linalg.norm(weights, axis=0)
    out = 0
    for weight, track in zip(weights, lines):
        out = out + weight * np.array([each_turn(turns, irfft(side, 16 * count)) for side in track])
    return out


def contact_pressure(turns, depth_db, count=14):
    """Teeth and bristles bear harder at certain angles of the bar."""
    pattern = rms_one(rng.standard_normal(count))
    return rms_one(from_db(depth_db * each_turn(turns, pattern)))


def rattle(slack_share):
    """Gain of the quick rattle of a slack drive."""
    return from_db(slack_share * (1.7 * drift(170) + 1.2 * drift(45)))


def brush_head(churn_db=-11.5, chatter_db=-6.5, hiss_db=-3.5, buzz_db=-4.0, coast_churn_db=11.0,
               coast_chatter_db=9.0, coast_hiss_db=1.5, coast_lines_db=1.0, line_fade=2.55,
               glide_loss_db=4.5, reflection_db=-21.0):
    """Clean drive lines over the churn of the bar; without power the slack drive rattles."""
    # churn of the bar: (frequency [Hz], relative level [dB per Hz])
    churn_colour = [(40, -59), (90, -21), (200, -10.5), (330, -2), (450, -0.5), (560, 9), (680, 1),
                    (820, 5), (1050, 0.5), (1400, 0.5), (1700, -29), (2400, -42)]
    # tooth chatter: (frequency [Hz], relative level [dB per Hz])
    chatter_colour = [(900, -37), (1350, -11.5), (1600, 0), (1850, 2.5), (2080, 4), (2350, -5.5),
                      (2650, -5.5), (3000, -42), (4000, -42)]
    # bristle hiss, also used to filter the buzz: (frequency [Hz], relative level [dB per Hz])
    bristle_colour = [(1650, -35.5), (2800, -3), (3240, -4.5), (3930, -3.5), (4680, -5.5), (4820, -1.5),
                      (5260, -7), (5690, -2.5), (6770, -6), (8240, -6.5), (9180, -4.5), (10100, 2),
                      (12800, -5.5), (14900, -7.5), (15800, -8.5)]
    t = np.arange(N) / SR
    speed = bar_speed()
    press = hand_pressure()
    powered = uniform_filter1d(sum(1.0 * (t > on) * (t < off) for on, off, *rest in RUNS), SR // 50)
    coasting = 1 - powered
    drone_db, whine_db, bristle_db = running_levels(speed, press, powered)
    # tooth contacts lose their regularity as the bar slows
    regular = (speed / FULL_SPEED_HZ) ** line_fade * from_db(coast_lines_db * coasting)
    slack = np.clip(2 * (1 - speed / FULL_SPEED_HZ), 0, 1)
    loose = coasting * np.sqrt(slack)
    turns = np.cumsum(speed * (1 + 0.000939 * drift(60))) / SR

    lines = drive_lines(turns, speed, press, drone_db, whine_db - glide_loss_db * off_speed(speed)) * regular
    lines += gliding_whines(turns, speed, coasting, drone_db, whine_db)
    lines += whistles(turns, speed) * regular ** 2
    # reflections off the bench reach the two sides differently
    lines = lines + from_db(reflection_db) * np.roll(lines, SR // 310) * [[1], [-1]]

    teeth = contact_pressure(turns, depth_db=2.0) * from_db(drift(70))
    churn = coloured(white() * teeth * rattle(loose), churn_colour)
    churn *= from_db(drone_db + churn_db + coast_churn_db * loose)
    chatter = coloured(white() * teeth * rattle(loose), chatter_colour)
    chatter *= from_db(whine_db + chatter_db + coast_chatter_db * slack)

    bristles = contact_pressure(turns, depth_db=1.0, count=18) * np.sqrt(rattle(loose))
    hiss = coloured(white() * bristles, bristle_colour)
    hiss *= from_db(bristle_db + hiss_db + coast_hiss_db * slack)
    # the highest lines blur into the hiss
    soften = signal.butter(1, 7500, fs=SR, output="sos")
    buzz = signal.sosfilt(soften, coloured(tooth_buzz(turns) * bristles, bristle_colour))
    buzz = rms_one(buzz) * from_db(bristle_db + buzz_db) * regular
    treble = (hiss + buzz) * from_db([[-.35], [.35]])  # a touch to the right
    return (lines + churn + chatter + treble) * (t > RUNS[0][0])


def scene():
    """A faint room hiss, hands and clicks a little to the right, the head near the middle."""
    clicks = workshop(part_knocks() + ticks())
    snaps = workshop(joint_snaps(), wet_db=-12.5)
    hands = without_bass(clicks + snaps + handling() + scrapes(), edge_hz=102)
    hands = hands * from_db([[-.5], [.5]])
    jolts = without_bass(workshop(drive_jolts() + shudders() + flutters()), edge_hz=137)
    return room_hiss() + hands + jolts + brush_head()


def record(dry):
    """The top is cut steeply, above 15850 Hz."""
    return signal.sosfilt(signal.ellip(12, .1, 80, 15850, fs=SR, output="sos"), dry)


dry = scene()
out = record(dry)
log_audio(out)
```